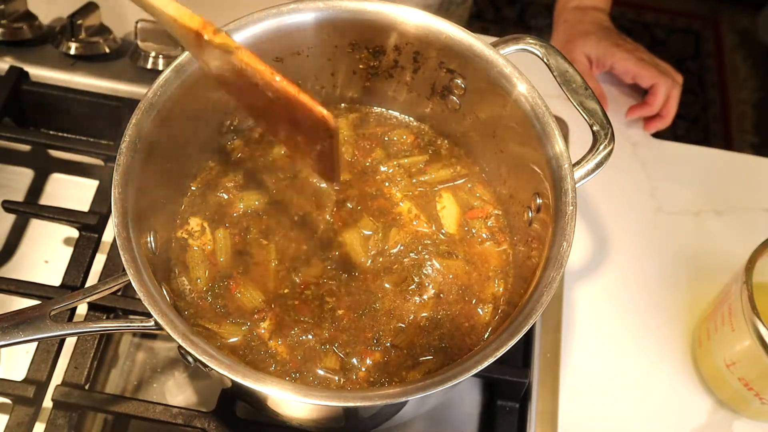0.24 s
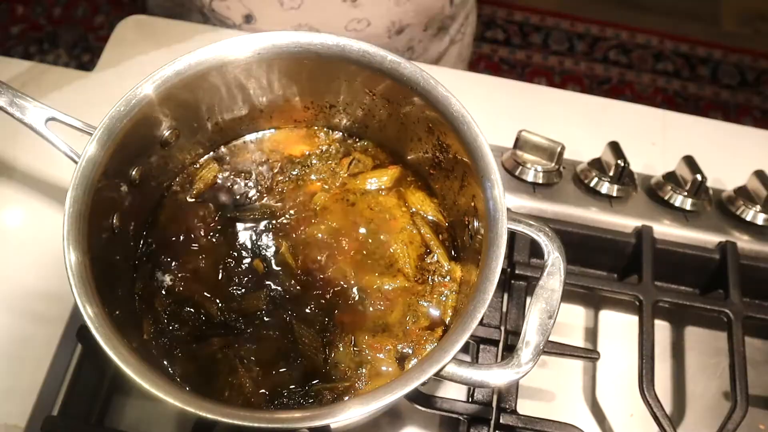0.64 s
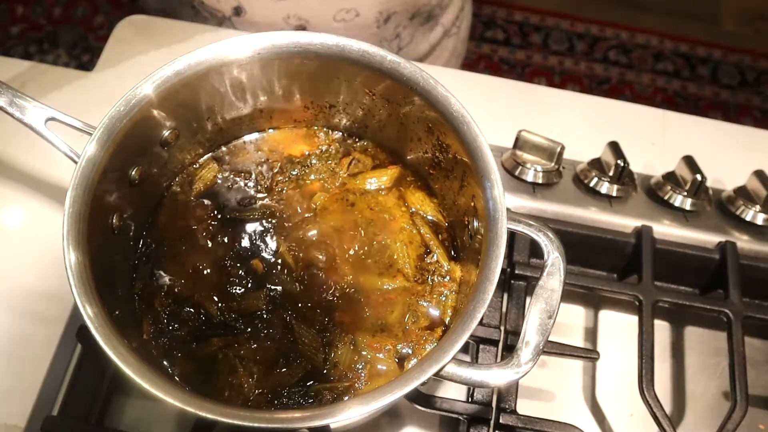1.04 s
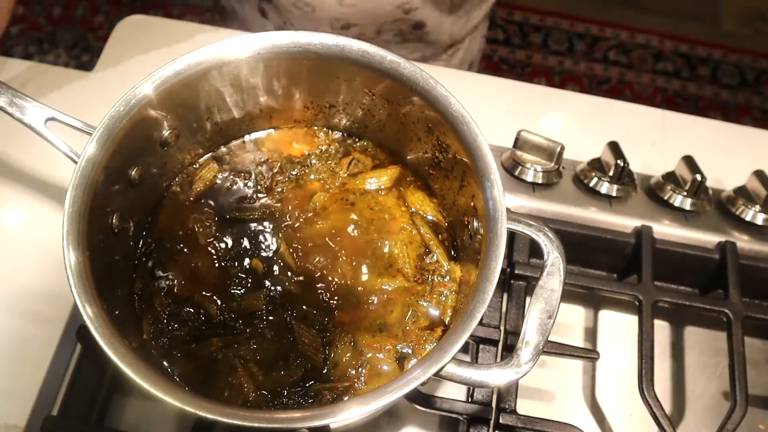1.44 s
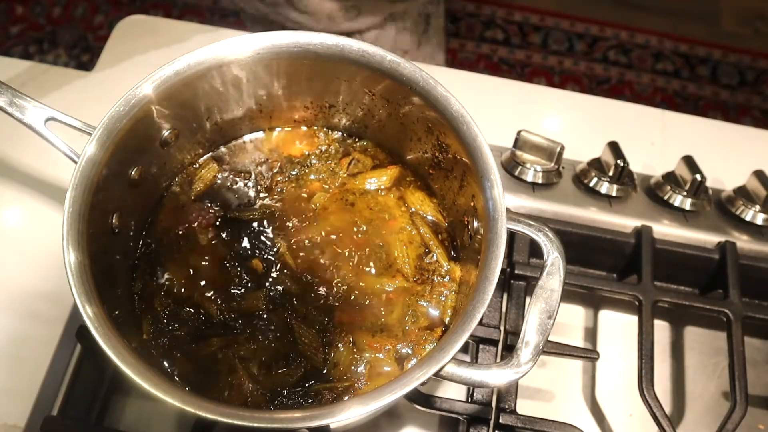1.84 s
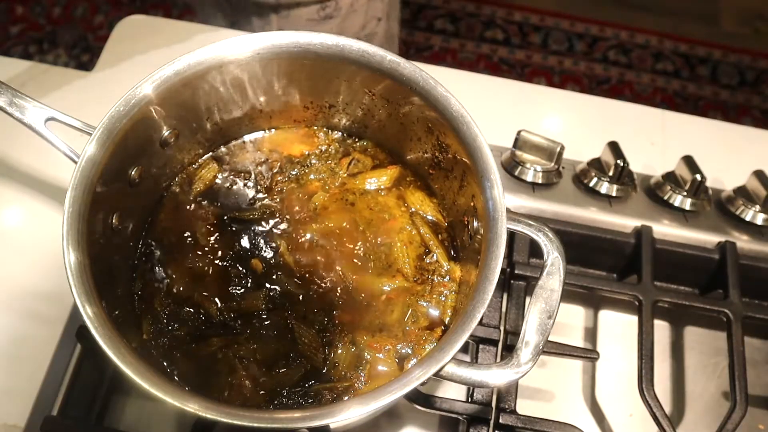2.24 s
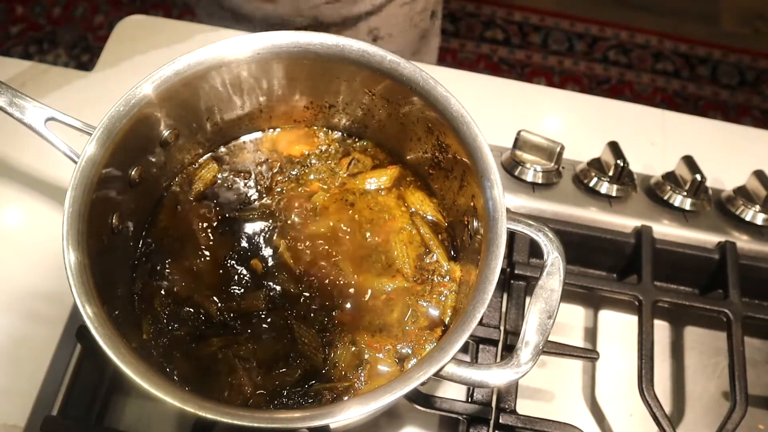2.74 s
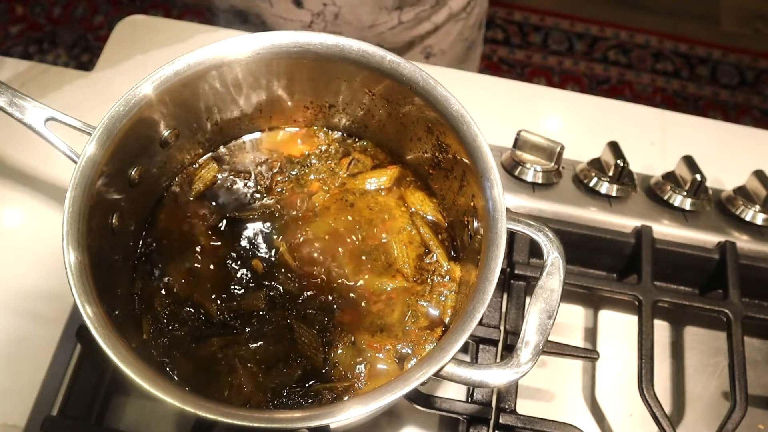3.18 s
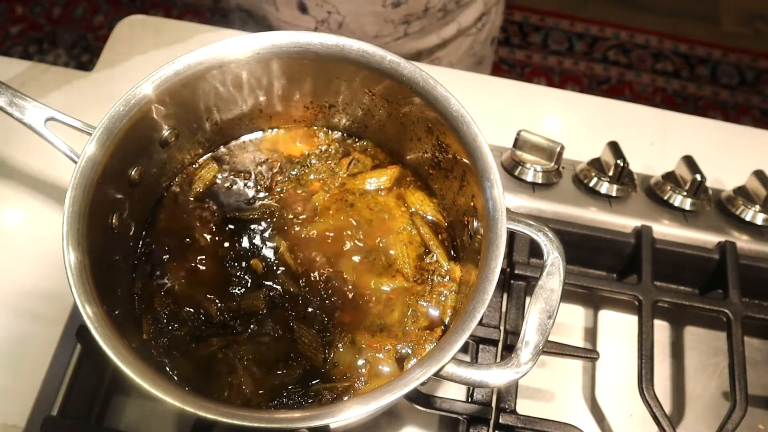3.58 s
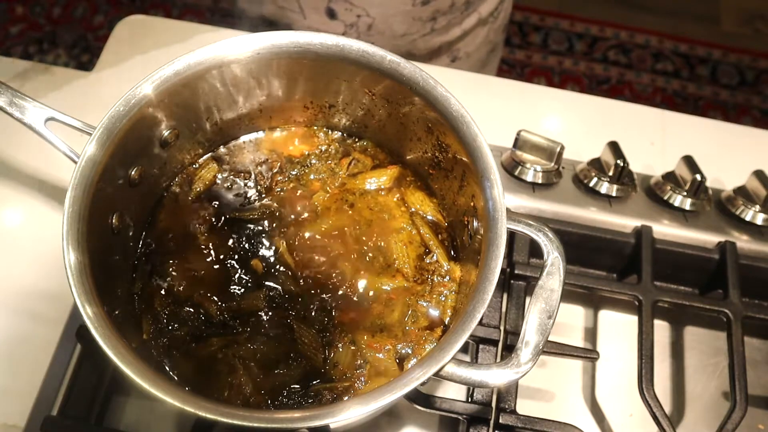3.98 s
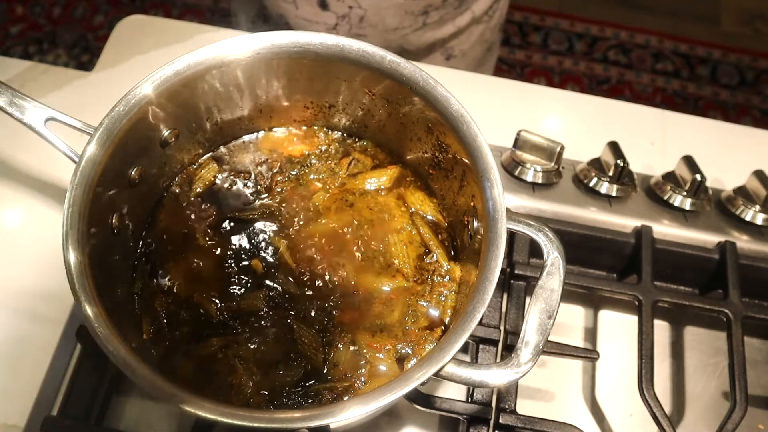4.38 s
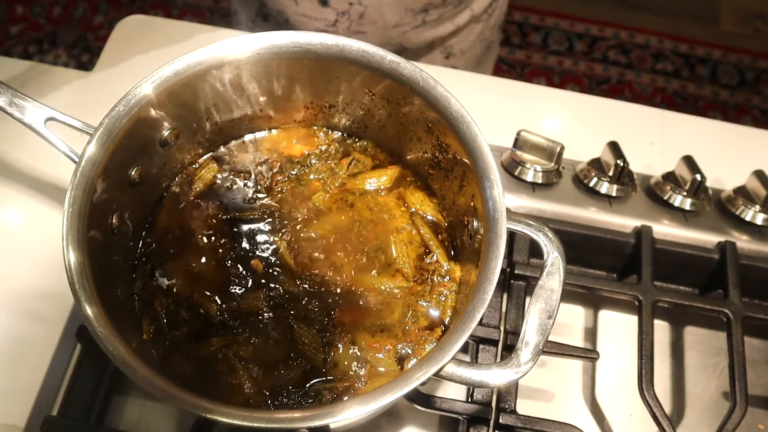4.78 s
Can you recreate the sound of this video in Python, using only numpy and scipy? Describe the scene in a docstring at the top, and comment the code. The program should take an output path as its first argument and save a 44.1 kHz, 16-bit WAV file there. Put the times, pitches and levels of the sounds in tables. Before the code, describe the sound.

Close to a steel pot in a small home kitchen: first only a soft gas burner rush and a barely audible spatula brush, then a brief dip at a cut. A dense simmer follows, with hollow plops, popping bubbles, fine ticks and a few sharp snaps. A utensil is set down early with a loud clack and small bounce. The bubbling continues to the end.

```python
"""In a small kitchen a thick stew simmers in a deep steel pot on a gas stove, heard from just above the rim.
First only the burner, as shaped noise, and a light stir; a cut with a brief fade leads to the simmering pot.
Cavities ring as decaying sines: bubbles plop, domes pop, fine ones tick, low air modes hum. A few bubbles snap
as resonant impulses, and splashes sizzle on the hot wall as grainy noise, one with a sharp crackle. A utensil
is put down with a clack and a bounce; decaying diffuse noise supplies the room's answer."""
import sys
import numpy as np
from scipy import signal
from scipy.fft import rfft, irfft, next_fast_len
from scipy.io import wavfile
from scipy.ndimage import uniform_filter1d

SR = 44100
rng = np.random.default_rng(int(sys.argv[2]) if len(sys.argv) > 2 else 0)


def digitize_waveform(pressure):
    """Quantize a signal to 16-bit integers and store it at the path in sys.argv[1].

    Rows of a 2-D input are taken as channels; values are limited to [-1, 1].
    """
    field = np.atleast_2d(pressure).T
    bounded = np.clip(field, -1, 1)
    quanta = np.round(bounded * 32767).astype(np.int16)
    wavfile.write(sys.argv[1], SR, quanta)


N = 221249
TIME = np.arange(N) / SR  # s
CUT_S, TOP_HZ = .67, 16000  # time of the cut to the simmering pot; upper band limit
POT_HZ = 1279  # air mode across the pot

# All source levels are nominal, ahead of placement, room and overall gain.
# Burner before the cut. Each row: frequency in Hz, relative density in dB per Hz.
EARLY_BURNER_SPECTRUM = [(13, -28), (22, -22), (97, -5), (143, -9.5), (204, -18.5), (248, -16),
                         (284, -11.5), (326, -15), (374, -15.5), (535, -18.5), (1360, -26.5), (2120, -29),
                         (4100, -31.5), (13000, -36), (15800, -37)]
# Burner and low murmur of the boil. Each row: frequency in Hz, relative density in dB per Hz.
BOIL_BURNER_SPECTRUM = [(13, -38), (22, -7), (44, -12), (121, 4), (173, -4.5), (235, -1.5), (374, -14),
                        (493, -4), (649, -3.5), (787, -15), (1260, -14.5), (1520, -17.5), (2950, -22.5),
                        (7940, -26), (15800, -29)]
# Interchannel coherence of the burner. Each row: frequency in Hz, left-right likeness from 0 to 1.
COHERENCE = [(30, 0.86), (120, 0.93), (400, 0.22), (1200, 0.16), (4000, 0.27), (14000, 0.32)]
# Reverberation of the kitchen. Each row: frequency in Hz, 60 dB decay time in s.
ROOM_DECAY = [(150, 0.21), (700, 0.11), (3000, 0.6), (7000, 0.27), (14000, 0.2)]
# The treble favours the right microphone. Each row: frequency in Hz, left-right difference in dB.
TREBLE_BALANCE = [(4000, 0), (8000, -2.5), (12000, -4)]
# Overall gain around the edit fade. Each row: time in s, gain in dB.
CUT_FADE = [(.635, 0), (.65, -6.5), (.668, -33), (.686, -11), (.697, -2.5), (.71, 2)]
# Wall tones under the spatula. Each row: frequency in Hz, relative level in dB.
WALL_TONES = [(4450, -7), (6000, -5), (8000, -10)]
# Contacts of the utensil, both ends and a bounce. Each row: start in s, level in dB, low-pass edge in Hz.
CONTACTS = [(1.2033, -5.5, 14000), (1.2043, -11, 14200), (1.335, -16, 13000), (1.352, -14, 4120)]
# Resonances of the utensil. Each row: frequency in Hz, width in Hz, relative level in dB.
UTENSIL_MODES = [(1174, 28, 3), (1500, 110, 0), (2160, 61, 1.5), (3240, 150, 5.5), (3890, 310, 5.5),
                 (3900, 200, -3), (4960, 170, 3), (5580, 260, 7), (6200, 140, -1), (6280, 130, 11),
                 (6670, 150, 11.5), (9980, 550, -3)]
# Broad body of the clack. Each row: frequency in Hz, relative density in dB per Hz.
CLACK_SPECTRUM = [(300, -26.5), (1200, -11.5), (3200, -18), (6500, -23), (8000, -17.5), (12000, -20),
                  (16000, -17)]
# Splashes on the hot wall. Each row: start in s, rms level in dB, rise in s, 60 dB decay time in s.
SPLASHES = [(0.959, -50, 0.015, 0.11), (1.721, -48, 0.025, 0.41), (2.981, -41.5, 0.00048, 0.21),
            (3.031, -59, .03, 0.9)]
# Hiss of a splash. Each row: frequency in Hz, relative density in dB per Hz.
HISS_SPECTRUM = [(400, -3), (1200, -3), (3000, -6.5), (5500, -3.5), (9000, -9), (16000, -18)]
# Clearest fine bubbles. Each row: start in s, level in dB, pitch in Hz.
CLEAR_TICKS = [(0.9264, -38, 8200), (1.0989, -43, 7100), (1.4962, -34.5, 7600), (1.5858, -41, 7610),
               (1.9235, -40, 6000), (2.3235, -37.5, 6200), (2.5236, -34, 9400), (2.8589, -43, 5400),
               (3.4453, -40, 8400), (3.7562, -39.5, 6920), (3.935, -38.5, 5000), (4.033, -40, 5340),
               (4.1692, -40, 5000), (4.2, -39.5, 8160), (4.5009, -34, 5170), (4.7621, -37.5, 5430),
               (4.9524, -35.5, 5960)]
# Low air modes around the stove. Each row: mean frequency in Hz, relative level in dB, 60 dB decay time in s.
AIR_MODES = [(121.5, 1, 0.36), (185.3, 6.5, 0.11), (228.6, 4.5, 0.26)]
# Taut domes that pop. Each row: start in s, level in dB, relative spatter level in dB.
DOMES = [(.733, -41.5, 0), (0.809, -40.5, -3.5), (1.053, -33, -11), (1.447, -40, 0.5), (1.673, -41.5, -15),
         (1.837, -41, -4), (1.8876, -27.5, -14.5), (2.0348, -33, -15), (2.427, -44, -1),
         (2.435, -34.5, -18), (2.633, -35, -13.5), (2.838, -33, -8.5), (3.196, -36.5, -8),
         (3.512, -44.5, 5), (3.534, -50.5, 12), (3.7, -41.5, 1), (4.408, -40, -11), (4.527, -41.5, -22),
         (4.702, -39, -9), (4.8162, -37.5, 4), (4.842, -30.5, -15)]
# Wet spatter of a dome. Each row: frequency in Hz, relative density in dB per Hz.
SPATTER_SPECTRUM = [(200, -37), (500, 4.5), (1200, 2), (2200, -8.5), (4000, -15.5), (8000, -35),
                    (16000, -40)]
# Sharp bursts: cracking bubbles, and at 2.983 s the crackle of a splash. # Each row: start in s, level in dB,
# lower resonance in Hz, its nominal height in dB, # height of the upper resonance in dB, delay of the wall echo
# in s.
SHARP_BURSTS = [(0.7136, -14, 2480, 16.5, 2.5, 0.00093), (0.8524, -21.5, 1640, 13, 0, 0.0025),
                (2.983, -26, 4270, 10, 4, 0.0026), (3.3408, -12, 3220, 11.5, 0.5, 0.001603),
                (4.298, -10.5, 2940, 15.5, 9, 0.0022), (4.9257, -18, 1520, 13, -1, 0.0009)]
# Broad body of a burst. Each row: frequency in Hz, relative density in dB per Hz.
BURST_SPECTRUM = [(300, -36), (1400, -31), (2200, -15), (3300, 5), (4200, -3.5), (5100, -1), (6300, -10),
                  (11500, -11), (16000, -36)]
# Big bubbles opening at the surface. Each row: start in s, level in dB, nominal pitch in Hz.
BIG_BUBBLES = [(0.953, -30, 510), (1.093, -37, 650), (1.107, -31, 585), (1.261, -30, 660),
               (1.744, -29.5, 510), (1.769, -33, 670), (1.874, -25.5, 730), (1.885, -28, 523),
               (2.034, -31.5, 620), (2.046, -26.5, 610), (2.088, -32, 651), (2.104, -31.5, 622),
               (2.175, -31.5, 580), (2.264, -32.5, 646), (2.427, -22.5, 670), (2.511, -36.5, 630),
               (2.599, -32.5, 623), (2.83, -29.5, 664), (2.955, -31, 651), (2.969, -30, 676),
               (3.066, -34.5, 570), (3.211, -19.5, 600), (3.417, -22, 616), (3.696, -30.5, 634),
               (3.78, -22, 595), (3.856, -35, 550), (3.98, -33.5, 610), (3.994, -28, 514),
               (4.324, -17.5, 684), (4.489, -30.5, 510), (4.604, -38, 500), (4.617, -29, 596),
               (4.783, -31.5, 503), (4.8, -23.5, 620), (4.949, -32.5, 655), (5.0, -33, 495)]

SWELL_CYCLES, GLIDE_PER_S = 0.99, 6  # cycles to the peak of a plop; relative rise in pitch per s
PLOP_DB = -2.5  # hollow note, relative to the level of its plop
TRAIN_LAG_S, TRAIN_SPREAD_S, TRAIN_DB = 0.006036, 0.012, -43  # smaller bubbles around each big one
# Hum under an average plop, dB more per dB of plop, ceiling
HEAVE_DB, HEAVE_GROWTH, HEAVE_MAX_DB = -49, 0.74, -43
HEAVE_UPPER_DB, HEAVE_LAG_S = -5, 0.00462  # further gain of the upper modes; delay of the hum
SIMMER_DB = -54.5  # rms of the steady boil


def amp(db):
    """Level and amplitude: twenty decibels make a factor of ten."""
    return 10 ** (np.asarray(db) / 20)


def unit(x):
    """Normalisation: a signal divided by its rms has rms 1."""
    return x / np.sqrt(np.mean(x ** 2) + 1e-20)


def fade(t, t60):
    """Exponential decay: the level falls 60 dB in t60 seconds."""
    return np.exp(-np.log(1000) * t / t60)


def along(points, hz):
    """Interpolation of (Hz, value) points on a logarithmic frequency axis."""
    f, v = np.transpose(points)
    return np.interp(np.log(hz + 1), np.log(f + 1), v)


def add(track, s, x):
    """Superposition: x is summed into the track from time s."""
    start = max(round(s * SR), 0)
    part = track[..., start:][..., :x.shape[-1]]
    part += x[..., :part.shape[-1]]


def filtered(x, response):
    """Linear filtering: the spectrum of x is multiplied by a response of frequency."""
    n = x.shape[-1]
    m = next_fast_len(n + 8192)  # room for the filter's tail
    return irfft(rfft(x, m) * response(np.fft.rfftfreq(m, 1 / SR)), m)[..., :n]


def colour(spectrum, peaks, hz):
    """Resonance: the powers of (Hz, width, dB) peaks add to that of a broad spectrum."""
    power = amp(along(spectrum, hz)) ** 2
    for f, width, db in peaks:
        power = power + amp(db) ** 2 / (1 + (2 * (hz - f) / width) ** 2)
    return np.sqrt(power)


def noise(spectrum, shape, peaks=()):
    """Spectral shaping: white noise through a coloured response, at rms 1."""
    return unit(filtered(rng.standard_normal(shape), lambda hz: colour(spectrum, peaks, hz)))


def impulse(spectrum, peaks, size=4096):
    """Minimum phase: the sharpest causal click of a given colour, from its folded cepstrum, peak 1."""
    cepstrum = irfft(np.log(colour(spectrum, peaks, np.fft.rfftfreq(size, 1 / SR))))
    click = irfft(np.exp(rfft(2 * cepstrum[:size // 2], size)))
    return click / np.abs(click).max()


def place(x, left_db, lead_us):
    """Interchannel level and time difference: positive values favour and advance the left."""
    side = np.array([[.5], [-.5]])

    def response(hz):
        gain = amp(side * (left_db + along(TREBLE_BALANCE, hz)))
        return gain * np.exp(2j * np.pi * hz * side * lead_us / 10 ** 6)
    return filtered(x, response)


def kitchen(x, wet_db):
    """Diffuse reverberation: convolution with softly starting noise that decays by frequency."""
    hz, t, z = signal.stft(rng.standard_normal((2, SR // 2)), SR, nperseg=256)
    decay = fade(t, along(ROOM_DECAY, hz)[:, None])
    tail = signal.istft(z * decay, SR, nperseg=256)[1]
    tail *= 1 - np.exp(-(np.arange(tail.shape[1]) / SR / 0.0013) ** 2)
    tail /= np.linalg.norm(tail[0])
    return amp(wet_db) * signal.fftconvolve(x[None], tail, axes=1)[:, :N]


def rush(spectrum):
    """Partial coherence: mid and side noises are mixed to the tabulated left-right likeness."""
    def mid_side(hz):
        angle = np.arccos(np.clip(along(COHERENCE, hz), -1, 1)) / 2
        return np.array([np.cos(angle), np.sin(angle)])
    mid, side = filtered(noise(spectrum, (2, N)), mid_side)
    return np.array([mid + side, mid - side])


def burner(early_db=-50, late_db=-50, swell_db=2):
    """Broadband flow noise: the gas flame and quiet kitchen, with the boil's low murmur after the cut."""
    early_gain = amp(early_db + swell_db * np.minimum(TIME / CUT_S, 1) ** 2)
    early = early_gain * rush(EARLY_BURNER_SPECTRUM)
    return np.where(TIME < CUT_S, early, amp(late_db) * rush(BOIL_BURNER_SPECTRUM))


def stir():
    """Friction excitation: the spatula brushes the wall and sounds its resonances faintly."""
    def wall(f):
        return sum(amp(db) / (1 + ((f - hz) / 130) ** 2) for hz, db in WALL_TONES)
    stroke = amp(-56) * np.exp(-np.abs(TIME - .515) / .04)  # centre and time constant in s
    return stroke * unit(filtered(rng.standard_normal((2, N)), wall))


def utensil(click_db=-5, ring_db=-10, ring_t60=0.041, scatter_db=-21, scatter_t60=0.12):
    """Impact excitation: each contact cracks and rings the utensil; the last, soft one is duller."""
    pair, click = np.zeros((2, N)), impulse(CLACK_SPECTRUM, UTENSIL_MODES)
    t = np.arange(len(click)) / SR
    for s, db, edge_hz in CONTACTS:
        ring = amp(ring_db) * noise(CLACK_SPECTRUM, len(t), UTENSIL_MODES) * fade(t, ring_t60)
        # scattering off the grates and the counter
        scatter = amp(scatter_db) * noise(CLACK_SPECTRUM, len(t)) * fade(t, scatter_t60)
        b, a = signal.butter(2, min(edge_hz, TOP_HZ), fs=SR)
        blow = amp(db) * signal.lfilter(b, a, amp(click_db) * click + ring + scatter)
        add(pair, s, place(blow, left_db=4.5, lead_us=27))
        add(pair, s, kitchen(blow, wet_db=-8))
    return pair


def sizzles(grain_db=0.5):
    """Rapid vaporisation: splashes boil off the hot wall as noise with a grainy envelope."""
    hiss, t = np.zeros(N), np.arange(SR // 2) / SR
    for s, db, rise, t60 in SPLASHES:
        flicker = unit(uniform_filter1d(rng.standard_normal(len(t)), size=60))
        grains = amp(grain_db * flicker)
        swell = np.minimum(t / rise, 1) * fade(np.maximum(t - rise, 0), t60)
        add(hiss, s, amp(db) * swell * unit(grains * noise(HISS_SPECTRUM, len(t))))
    return place(hiss, left_db=3.5, lead_us=29) + kitchen(hiss, wet_db=-5.5)


def tick(hz):
    """Film rupture: a brief decaying sine in a spray of noise."""
    t = np.arange(SR // 60) / SR
    spray = noise([(1500, -29), (5000, 3.5), (9000, 2.5), (16000, -15.5)], len(t))
    return fade(t, .007) * (.55 * np.sin(2 * np.pi * hz * t) + .65 * spray)


def fizz(count=140, tick_db=0.5, faint_db=-48.0, spread_db=2.5):
    """Random superposition: fine bubbles at the edge of the stew, some clear and many faint."""
    ticks = np.zeros(N)
    for s, db, hz in CLEAR_TICKS:
        add(ticks, s, amp(db + tick_db) * tick(hz))
    for when, pitch, size in np.c_[rng.random(count), rng.standard_normal((count, 2))]:
        hz = min(5000 * np.exp(.4 * pitch), TOP_HZ)
        s = CUT_S + when * (N / SR - CUT_S)
        add(ticks, s, amp(faint_db + spread_db * size) * tick(hz))
    return place(ticks, left_db=3.0, lead_us=32.0) + kitchen(ticks, wet_db=-6.0)


def bubble(hz, swell):
    """Cavity resonance: an opening cavity swells, rings a few cycles and rises in pitch as it empties."""
    t = np.arange(SR // 25) / SR
    envelope = t / swell * np.exp(1 - t / swell)  # peaks at t = swell
    return envelope * np.sin(2 * np.pi * hz * (t + GLIDE_PER_S * t * t / 2))


def simmer(count=800, spread_db=8):
    """Random superposition: a dense run of short-lived small cavities, the higher ones weaker."""
    voice = np.zeros(N)
    draws = np.c_[rng.random((count, 3)), rng.standard_normal((count, 2))]
    for when, kind, size, pitch, life in draws:
        # some bubbles sound near the pot's air mode
        hz = POT_HZ * np.exp(.05 * pitch) if kind < .15 else 670 * np.exp(.22 * pitch)
        weight = min(650 / hz, 1) ** 1.1 * amp(spread_db * (2 * size - 1))
        swell = .0012 * np.exp(.3 * life)  # s
        add(voice, CUT_S + when * (N / SR - CUT_S), weight * bubble(hz, swell))
    voice = unit(voice) * amp(SIMMER_DB)
    return place(voice, left_db=3.5, lead_us=18) + kitchen(voice, wet_db=-5.5)


def heaves(rise=0.0053):
    """Modal excitation: steam from each big bubble sets low air modes humming, louder for bigger puffs."""
    boom, t = np.zeros(N), np.arange(SR // 3) / SR
    average_db = np.mean([db for s, db, hz in BIG_BUBBLES])
    for s, db, _ in BIG_BUBBLES:
        modes = []
        for hz, level, t60 in AIR_MODES:
            mode_hz = hz * (1 + 0.016 * rng.normal())
            modes.append(amp(level) * fade(t, t60) * np.sin(2 * np.pi * mode_hz * t))
        low, *upper = modes
        puff_db = min(HEAVE_DB + HEAVE_GROWTH * (db - average_db), HEAVE_MAX_DB)
        puff = amp(puff_db) * (1 - np.exp(-t / rise))
        add(boom, s + HEAVE_LAG_S, puff * (low + amp(HEAVE_UPPER_DB) * sum(upper)))
    return place(boom, left_db=-0.3, lead_us=10) + kitchen(boom, wet_db=-10.5)


def pops(t60=0.044, attack=0.0015, sag=0.05, settle=0.002):
    """Coupled resonance: a torn dome spatters, its note climbing to near the pot's air mode as it opens."""
    voice, t = np.zeros(N), np.arange(SR // 16) / SR
    for s, db, spatter_db in DOMES:
        hz = POT_HZ * (1 + 0.0097 * rng.normal() - sag * np.exp(-t / settle))
        tone = np.sin(2 * np.pi * np.cumsum(hz) / SR)
        ring = tone * (1 - np.exp(-t / attack)) * fade(t, t60)
        spatter = amp(spatter_db) * noise(SPATTER_SPECTRUM, len(t)) * fade(t, 0.052)
        add(voice, s, amp(db) * (1.01 * ring + 0.84 * spatter))
    return place(voice, left_db=4.0, lead_us=42) + kitchen(voice, wet_db=-24)


def snaps(wall_db=-1, click_db=-4, tear_db=-14, tear_t60=0.0046, spray_db=-23, spray_t60=0.077,
          width_hz=600, upper_hz=5100):
    """Impulse and reflection: tight bubbles crack, ring at two pitches and spray, and one splash on the wall
    crackles alike; steel echoes the crack."""
    cracks = np.zeros(N)
    for s, db, hz, height_db, upper_db, wall_s in SHARP_BURSTS:
        cavity = [(hz, width_hz, height_db - 6.5), (upper_hz, width_hz, upper_db)]
        click = amp(click_db) * impulse(BURST_SPECTRUM, cavity)
        t = np.arange(len(click)) / SR
        envelope = amp(tear_db) * fade(t, tear_t60) + amp(spray_db) * fade(t, spray_t60)
        spray = noise(BURST_SPECTRUM, len(t), cavity) * envelope
        add(cracks, s, amp(db) * (click + spray))
        add(cracks, s + wall_s, amp(db + wall_db) * click)
    return place(cracks, left_db=5.0, lead_us=31.0) + kitchen(cracks, wet_db=-11.5)


def plops(slosh_db=-20, slosh_t60=0.066, slosh_rise=0.0015, start_pitch=0.98, count=2):
    """Cavity resonance: big bubbles open with a hollow note and wet slosh, each among smaller ones."""
    voice, t = np.zeros(N), np.arange(SR // 12) / SR
    slosh_spectrum = [(150, -12), (400, -23.0), (900, 7.5), (1400, -17), (2200, -22), (6000, -49)]
    for s, db, hz in BIG_BUBBLES:
        slosh = noise(slosh_spectrum, len(t)) * (1 - np.exp(-t / slosh_rise)) * fade(t, slosh_t60)
        add(voice, s, amp(db + PLOP_DB) * bubble(start_pitch * hz, SWELL_CYCLES / hz))
        add(voice, s, amp(db + slosh_db) * slosh)
        for when, size, pitch in rng.standard_normal((count, 3)):
            small_hz = 590 * np.exp(.12 * pitch)
            small = amp(TRAIN_DB + 3.6 * size) * bubble(small_hz, SWELL_CYCLES / small_hz)
            add(voice, s + TRAIN_LAG_S + TRAIN_SPREAD_S * when, small)
    return place(voice, left_db=3.8, lead_us=12) + kitchen(voice, wet_db=-10)


def scene():
    """Superposition of all sources, from the background to the big bubbles."""
    background = burner() + stir() + utensil() + sizzles()
    return background + fizz() + simmer() + heaves() + pops() + snaps() + plops()


def record(dry):
    """Gain and band limiting: the level fades out and in around the cut; the band ends at its limit."""
    gain = amp(np.interp(TIME, *np.transpose(CUT_FADE)))
    return filtered(dry * gain, lambda hz: hz < TOP_HZ)


dry = scene()
out = record(dry)
digitize_waveform(out)
```